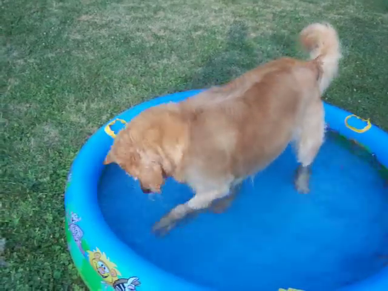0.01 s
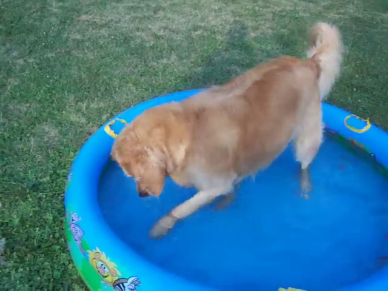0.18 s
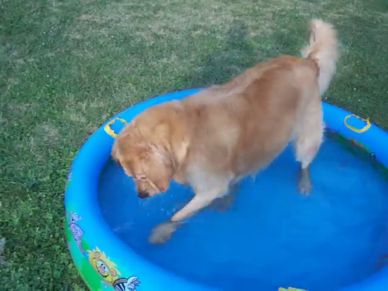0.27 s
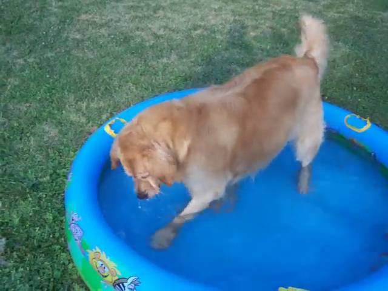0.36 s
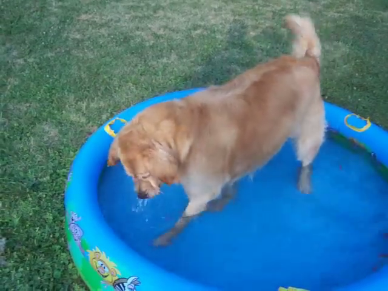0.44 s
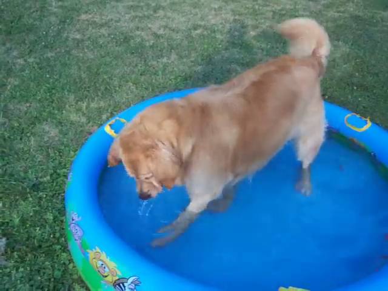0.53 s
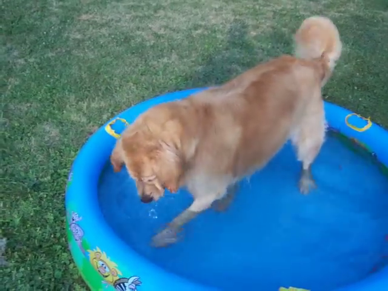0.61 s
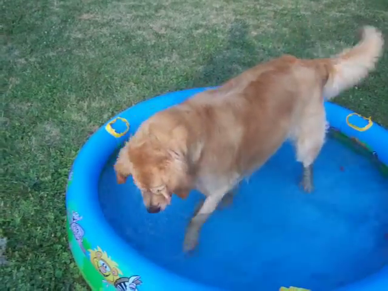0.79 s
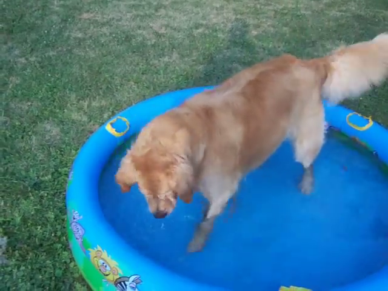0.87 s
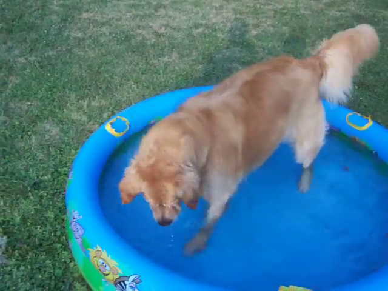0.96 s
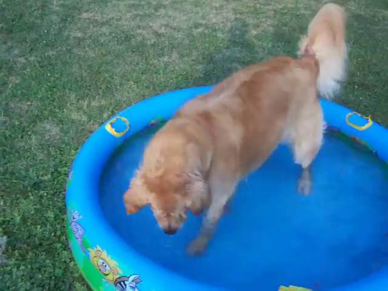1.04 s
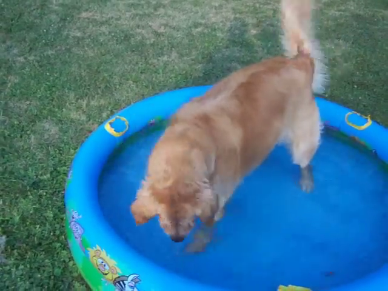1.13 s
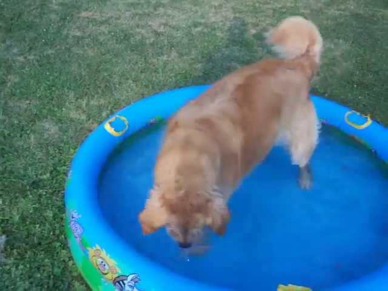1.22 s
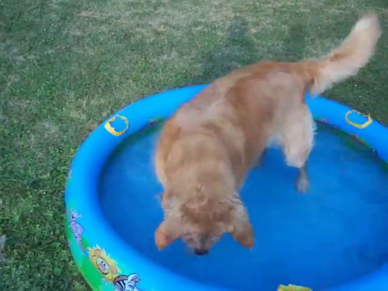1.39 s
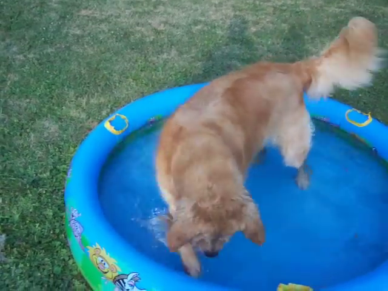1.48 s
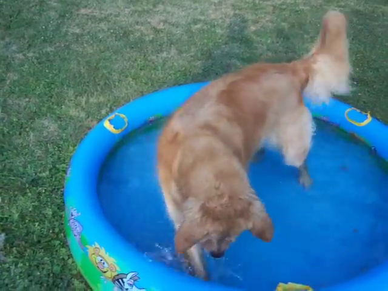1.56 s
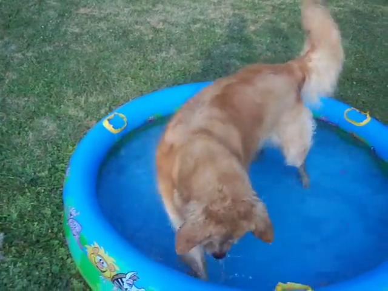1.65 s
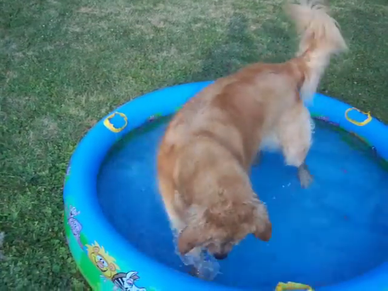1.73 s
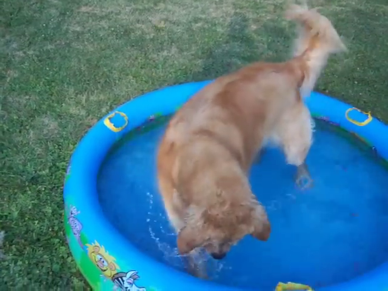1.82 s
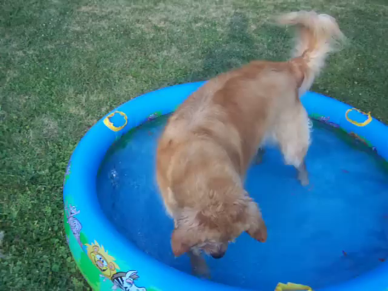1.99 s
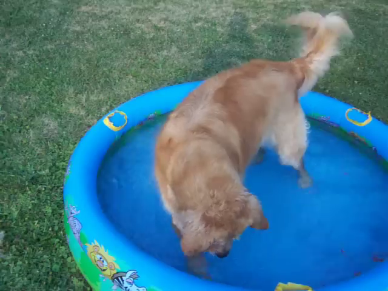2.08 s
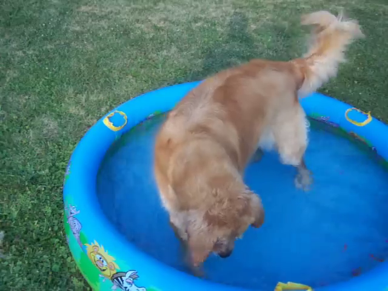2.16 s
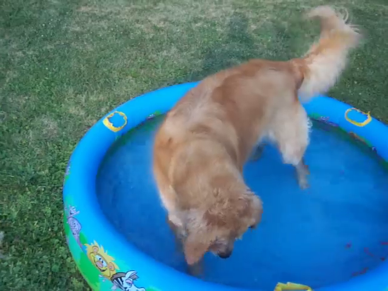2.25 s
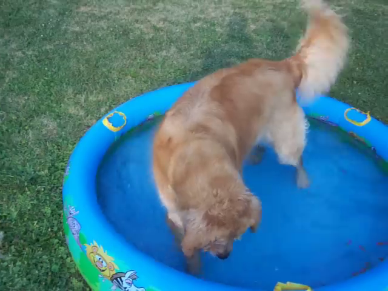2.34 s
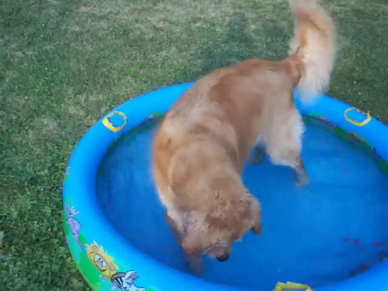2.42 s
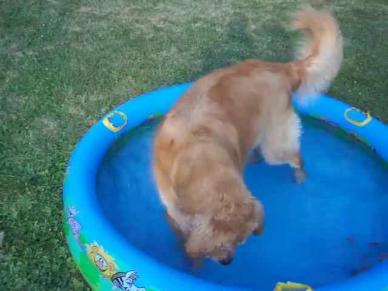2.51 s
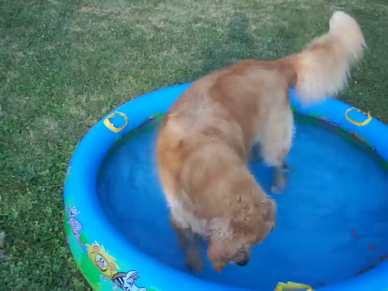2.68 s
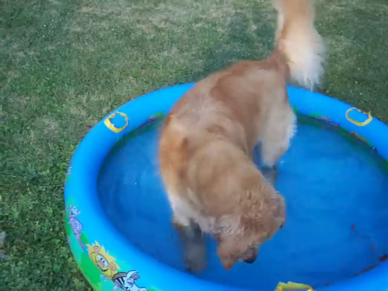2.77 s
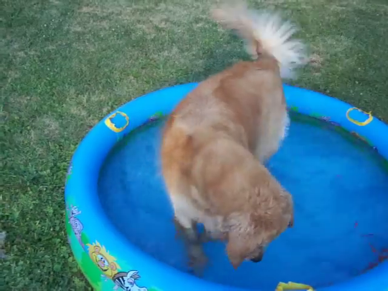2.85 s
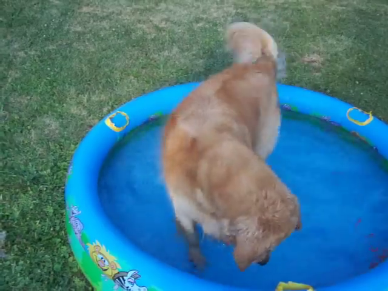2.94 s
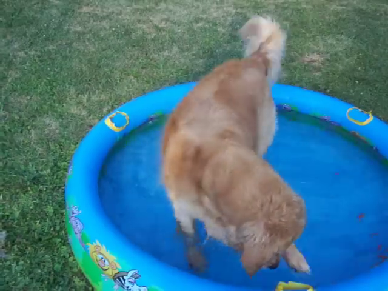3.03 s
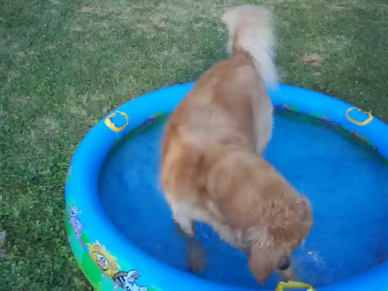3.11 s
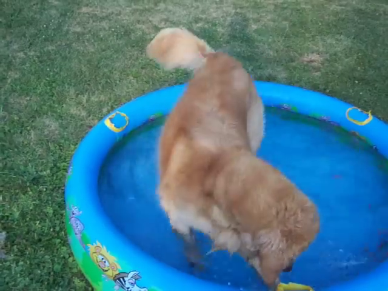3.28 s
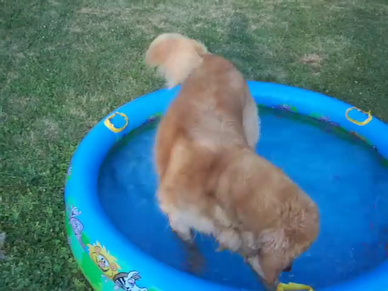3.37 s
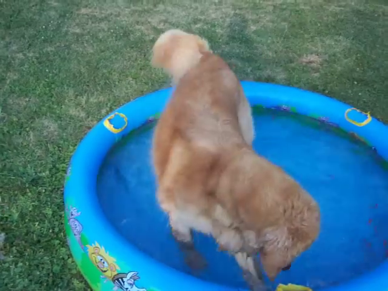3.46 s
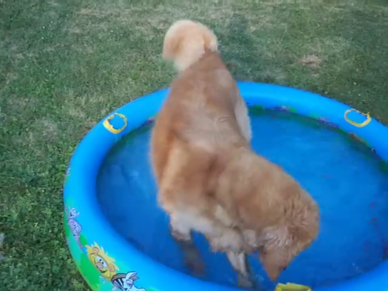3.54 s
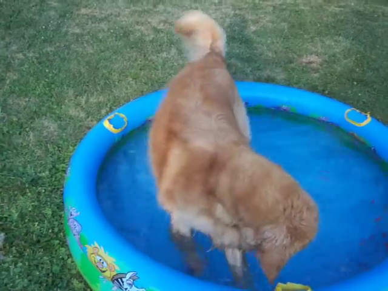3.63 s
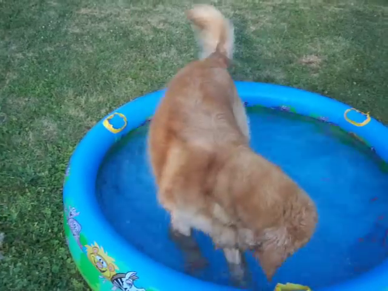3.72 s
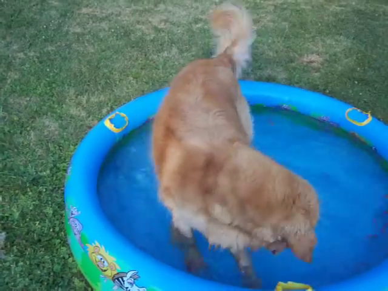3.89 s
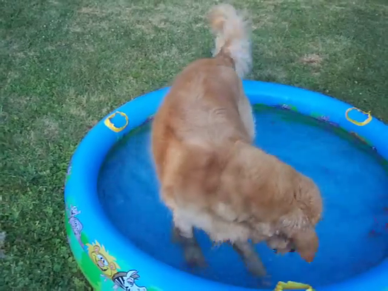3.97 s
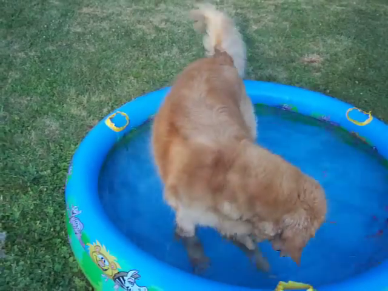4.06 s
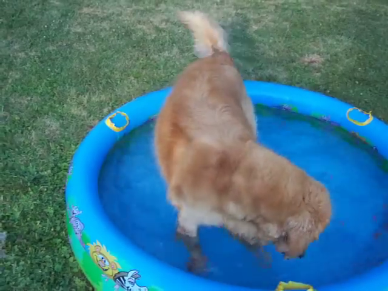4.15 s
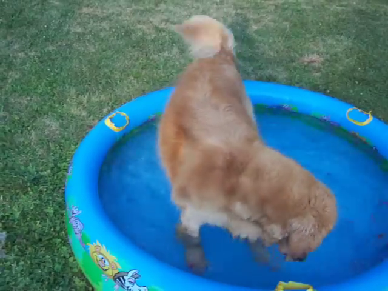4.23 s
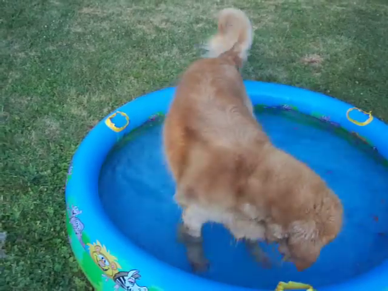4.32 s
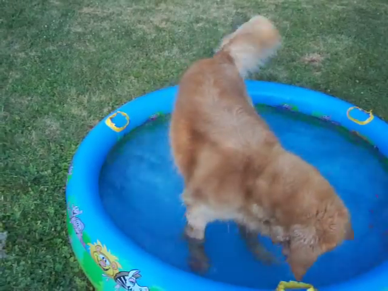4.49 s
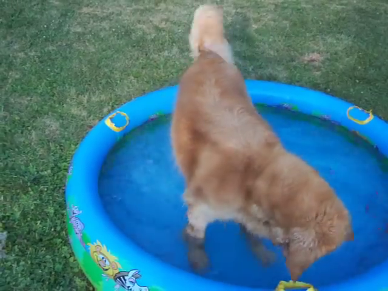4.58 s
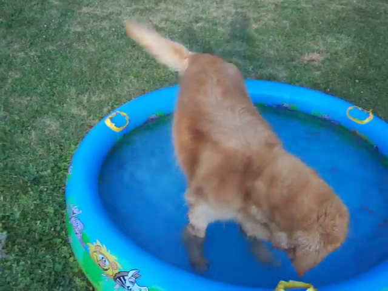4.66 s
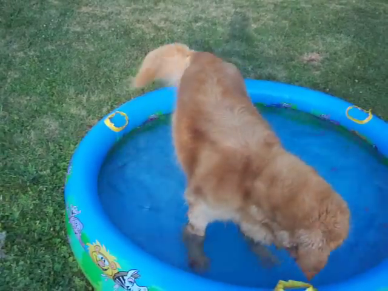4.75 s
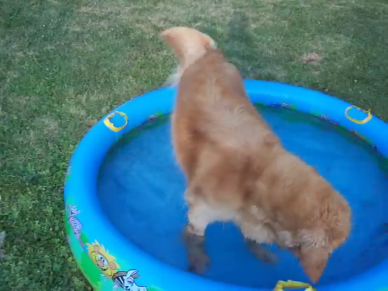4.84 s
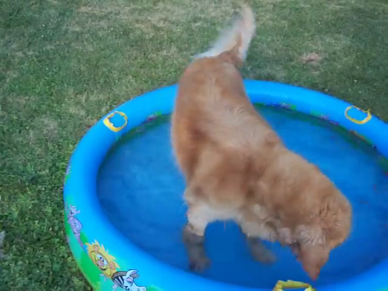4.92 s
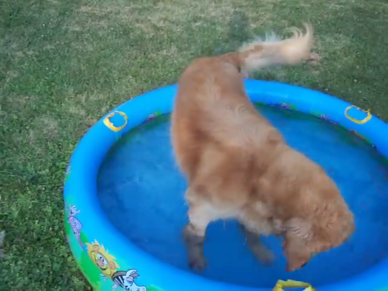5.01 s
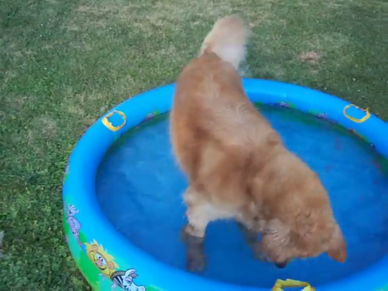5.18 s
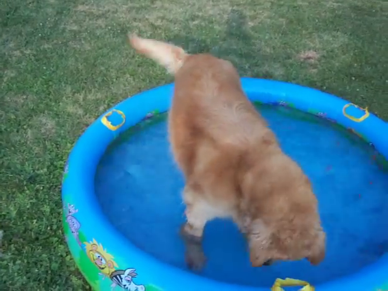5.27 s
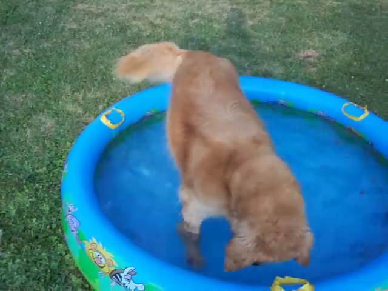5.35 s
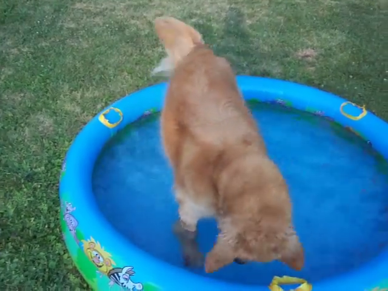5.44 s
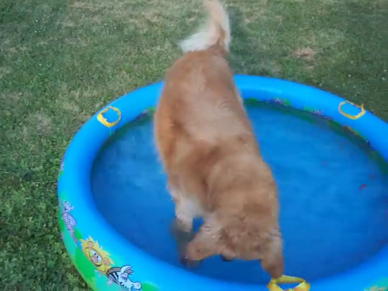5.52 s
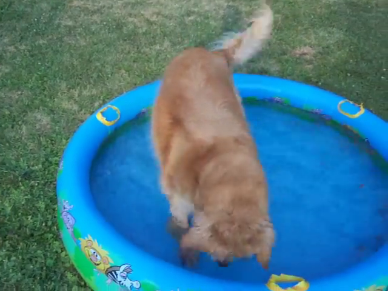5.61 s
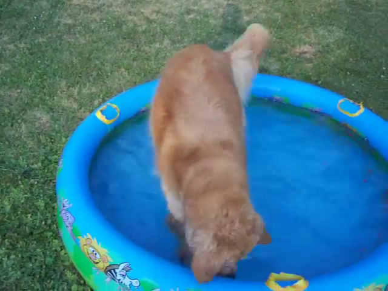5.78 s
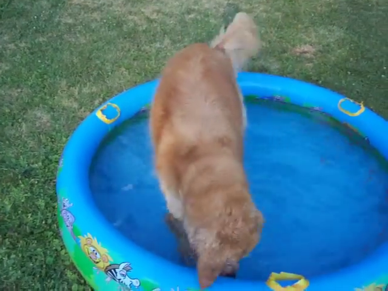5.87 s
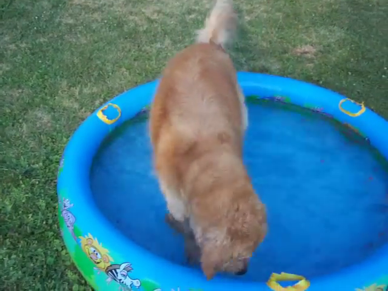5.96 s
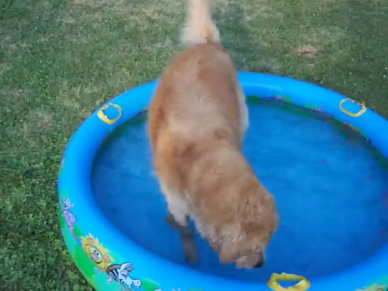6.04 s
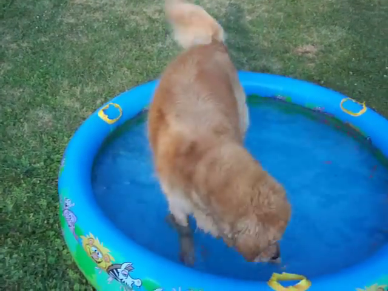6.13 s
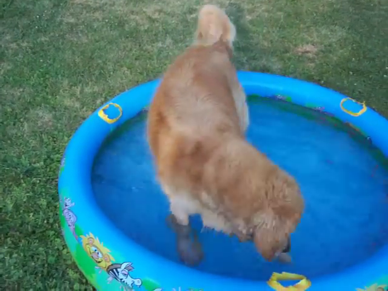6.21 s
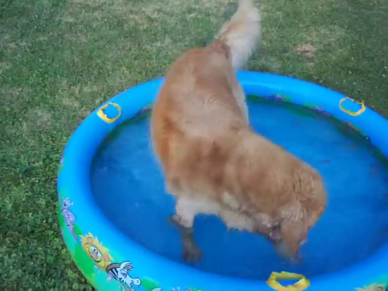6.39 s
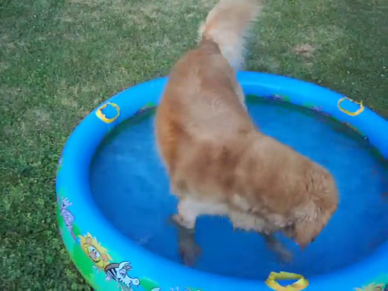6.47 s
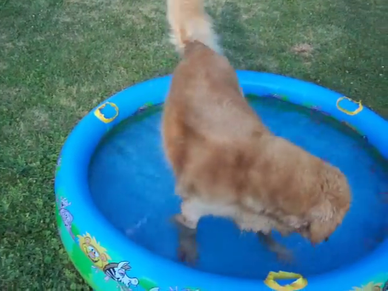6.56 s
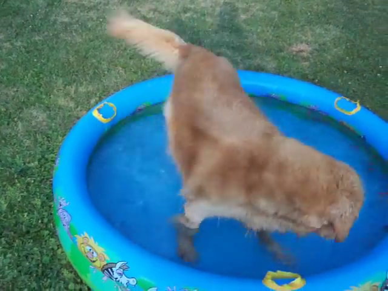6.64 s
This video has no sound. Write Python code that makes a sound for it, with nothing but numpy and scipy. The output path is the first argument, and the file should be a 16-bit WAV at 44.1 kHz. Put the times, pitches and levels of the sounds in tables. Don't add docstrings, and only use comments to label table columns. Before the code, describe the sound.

Outdoors on a lawn, a dog paws at shallow water in an inflatable pool. Sharp slaps and ringing droplets come in two main bouts, the second with deeper gulps. Between and after them a nearby songbird rattles off quick falling whistles. Insects buzz later, and a distant road grows slightly louder. The small camera microphone is dull on top, hissy, and overloads briefly on the hardest slaps.

```python
import sys
import numpy as np
from scipy import signal
from scipy.io import wavfile
from scipy.ndimage import uniform_filter1d

SR = 44100
rng = np.random.default_rng(int(sys.argv[2]) if len(sys.argv) > 2 else 0)


def transcribe(u):
    v = np.clip(np.atleast_2d(u).T, -1, 1)
    q = np.round(v * 32767).astype(np.int16)
    wavfile.write(sys.argv[1], SR, q)


def amplitude_ratio(level_db):
    exponent = np.asarray(level_db, float) / 20
    return 10 ** exponent


N = 295470

# (time [s], hold [s], spray level [dB],
# fizz level [dB])
STROKES = [(0.001, 0.01, -34.5, -62), (.452, 0.029, -22.5, -52.5), (1.01, 0.15, -34.5, -59),
           (1.475, 0.029, -34.5, -53), (1.532, 0.052, -23, -43.5), (1.625, 0.055, -22.5, -48.5),
           (1.71, 0.16, -35.5, -58), (1.845, 0.11, -28.5, -59), (2.94, 0.16, -29, -57),
           (3.135, 0.014, -19, -43), (3.19, 0.044, -26, -53), (3.25, 0.087, -24.5, -55),
           (3.42, 0.25, -32, -56.5), (1.33, 0.11, -36, -62), (.05, 1.6, -58, -67.5), (1.97, 1.7, -51, -64),
           (3.66, 0.6, -42, -63), (5.71, 0.03, -39, -66), (6.04, 0.019, -32.5, -59)]
STROKE_RISE_S, STROKE_FADE_DB_PER_S = 0.026, 401.5
DRIP_DB, DRIP_FIZZ_DB = -39, -71.5
SWELL = 0.09
# (time [s], hold [s], level [dB])
SLOSH = [
    (.44, 0.032, -38),
    (1.31, 0.15, -34.5),
    (1.65, 0.01, -36),
    (2.94, .025, -40),
    (3.12, 0.016, -40.5),
    (3.26, 0.035, -36),
    (3.48, 0.14, -33.5),
]
SLOSH_RISE_S, SLOSH_FADE_DB_PER_S, LAPPING_DB = 0.016, 255, -49.5

# (time [s], peak level [dB], bubble pitch [Hz])
SMACKS = [(.1016, -16, 5400), (.3792, -15, 3530), (.4478, -8, 3970), (.573, -20, 3600), (.6463, -18, 2210),
          (.7022, -7.5, 3020), (.7502, -20, 3350), (.7924, -24.5, 3700), (.9415, -15, 2360),
          (1.1212, -12.5, 3900), (1.1265, -18, 3560), (1.3543, -20, 2190), (1.487, -6, 2780),
          (1.5168, -4, 4900), (1.5494, -9, 4400), (1.5526, -14, 4400), (1.6765, -3, 4140),
          (1.699, -17, 3270), (1.7956, -21, 2460), (1.903, -11.5, 3260), (2.798, -16, 3770),
          (3.1201, -2, 2880), (5.7216, -17, 2920), (6.1382, -22, 4020)]
# (time [s], peak level [dB], bubble pitch [Hz])
PLINKS = [(.0813, -17, 4220), (.178, -25.5, 3320), (.4, -23.5, 2470), (.4064, -25, 3300),
          (.656, -19.5, 3380), (.6875, -12, 4280), (1.1403, -14.5, 3240), (1.5246, -20, 4460),
          (1.5753, -13, 3700), (1.6436, -9.5, 3500), (1.667, -7.5, 4340), (1.7197, -17.5, 2940),
          (1.8208, -16, 3500), (1.8538, -12.5, 2960), (2.005, -20, 3900), (2.0741, -19, 3420),
          (3.0986, -11.5, 4050), (3.1509, -7.5, 3350), (3.3945, -15.5, 2250), (6.346, -26, 3530)]
# (time [s], peak level [dB], bubble pitch [Hz])
BELLS = [(.4662, -17, 4930), (.9167, -23, 3520), (.972, -24, 3700), (1.1072, -25, 3400), (1.168, -28, 3800),
         (1.2243, -18, 3840), (1.467, -22, 3816), (1.602, -33, 3920), (1.74, -15, 4150),
         (1.9213, -15, 3840), (1.9225, -12, 3320), (3.0586, -12, 3700), (3.066, -12, 4000),
         (3.1522, -12, 3360), (3.2005, -11, 4160), (3.2545, -14.5, 4530), (3.2786, -16, 4010),
         (3.321, -12, 3130), (5.6606, -19.5, 4560), (5.9293, -18.5, 3550), (6.0202, -25.5, 4070)]
SMACK_RING_DB, PLINK_RING_DB, BELL_RING_DB = -3, 2.5, 4.5
# (time [s], peak level [dB], pitch [Hz])
SPECKS = [(0.3815, -15.5, 4450), (.107, -26, 6500), (.128, -31, 7000), (.193, -20, 7800),
          (.1985, -22, 4000), (.315, -27, 7600), (.322, -25, 3200), (.4349, -30, 5500), (.481, -13, 5000),
          (.4855, -16, 5300), (.512, -28, 5000), (.524, -31, 4970), (.7118, -29, 5500), (.7417, -18, 7150),
          (1.0101, -22, 6000), (1.494, -16, 6500), (1.5217, -9, 5250), (1.5262, -6, 4400),
          (3.201, -3, 4420), (3.279, -5, 4000), (1.535, -20, 7000), (1.5454, -18, 6800), (1.563, -24, 3500),
          (1.572, -9, 5700), (1.585, -18, 4000), (1.6045, -14, 5550), (1.6223, -18, 3700),
          (1.632, -20, 3800), (1.6828, -12, 4700), (1.7105, -20, 6500), (1.8237, -4.5, 7750),
          (1.9624, -17, 6750), (2.0168, -19, 6500), (.4575, -12, 5300), (2.286, -24, 6500),
          (2.7516, -17, 6900), (3.0619, -11, 6850), (3.087, -18, 5500), (3.1223, -3, 4650),
          (3.1365, -13, 3470), (3.142, -11, 4500), (3.156, -13, 4800), (3.183, -7, 6800), (3.209, -7, 4300),
          (3.215, -5, 4600), (3.258, -20, 3500), (3.2955, -12, 4000), (3.418, -13.5, 3740),
          (3.478, -18, 3000), (3.498, -14.5, 2300), (3.511, -20, 6500), (3.55, -17, 2800),
          (3.558, -17, 4460), (3.5678, -16, 7000), (3.595, -16, 2800), (3.97, -22, 2800),
          (4.073, -15.5, 2900), (4.13, -20, 7500), (.4445, -15, 4800)]
# (time [s], peak level [dB], pitch [Hz], ring T60 [s])
POPS = [(1.3, -22, 2000, 0.013), (1.9, -22.5, 1250, 0.023), (1.5, -14.5, 1370, 0.009),
        (1.6779, -6, 1620, 0.0055), (1.6, -19, 1610, 0.022), (2.9442, -19.5, 950, 0.042),
        (1.8, -24, 1100, 0.036), (3.1363, -18, 940, 0.015), (3.2, -21, 1090, 0.021),
        (3.526, -22, 900, 0.015), (2.95, -18.5, 2090, 0.03), (1.9, -9, 7570, 0.0081),
        (3.596, 2, 7700, 0.0068), (1.667, -16, 790, 0.02)]
# (time [s], peak level [dB], pitch [Hz], ring T60 [s])
GULPS = [(0.443, -25, 268, 0.034), (1.306, -24.5, 406, 0.066), (1.655, -15, 608, 0.026),
         (1.664, -14.5, 490, 0.02), (1.679, -30, 890, 0.021), (1.856, -25.5, 1020, 0.055),
         (2.943, -48, 950, 0.062), (3.132, -28, 750, 0.04), (3.289, -22, 680, 0.045),
         (3.297, -19, 480, 0.036), (3.337, -26, 565, 0.064), (3.307, -16.5, 398, 0.058),
         (3.341, -5.5, 534, 0.046), (3.553, -24, 434, 0.081), (3.594, -26, 490, 0.052),
         (3.4, -23, 382, 0.053), (3.477, -32, 655, 0.095), (3.539, -19.5, 363, 0.061),
         (3.931, -28, 562, 0.16), (4.026, -24.5, 458, 0.041), (5.76, -14.5, 746, 0.016)]
POOL_HZ = 285.6

# (time [s], length [s], start pitch [Hz], end pitch [Hz], level [dB])
BOW_NOTES = [(2.106, 0.01, 6870, 3860, -18), (2.229, 0.0079, 5850, 4480, -29),
             (2.306, 0.017, 6350, 3260, -25.5), (2.058, 0.0054, 5200, 4300, -25.5),
             (3.36, .008, 6600, 5800, -30), (2.769, 0.01, 7240, 4700, -16.5),
             (2.868, 0.018, 6240, 3770, -20.5), (2.903, 0.0065, 6800, 5020, -23),
             (3.185, 0.0075, 5980, 5450, -25), (3.231, 0.014, 7090, 4690, -19.5),
             (3.351, 0.025, 6260, 4570, -24), (3.533, 0.03, 4700, 3950, -29),
             (3.728, 0.013, 4560, 3460, -28), (4.117, 0.022, 6600, 3850, -21.5),
             (4.246, .012, 5500, 4200, -26), (4.253, 0.013, 6530, 5320, -23),
             (4.659, 0.013, 5500, 3800, -29), (4.941, 0.029, 5600, 4150, -34.5),
             (5.318, 0.01, 6440, 5400, -29)]
# (time [s], length [s], start pitch [Hz], end pitch [Hz], level [dB])
FLICK_NOTES = [(2.169, 0.015, 6500, 3700, -23.5), (2.237, 0.011, 5430, 3014, -29),
               (2.219, .006, 6300, 5700, -26), (2.448, 0.013, 5120, 3200, -33),
               (2.461, .007, 7400, 6500, -28), (2.204, .008, 2400, 4000, -32.5),
               (2.987, .006, 6030, 5400, -29), (3.195, .009, 6280, 5700, -26),
               (3.671, 0.0055, 6240, 5560, -26), (2.362, 0.0078, 5460, 6600, -27.5),
               (2.472, 0.008, 7030, 5000, -25.5), (2.552, 0.0056, 7340, 5240, -16.5),
               (2.668, 0.0044, 6700, 5000, -20), (2.739, 0.011, 5670, 5930, -22.5),
               (2.825, 0.0044, 7200, 4900, -17.5), (2.878, 0.016, 5910, 3800, -24.5),
               (3.015, 0.0062, 6060, 5350, -20.5), (3.047, 0.0056, 6200, 5150, -18),
               (3.456, 0.028, 4600, 4000, -28), (3.663, 0.006, 5900, 5040, -22),
               (3.768, 0.017, 6730, 3580, -26), (3.924, 0.011, 5670, 3980, -31),
               (3.95, 0.025, 6300, 3580, -28.5), (4.067, 0.01, 6520, 4200, -18.5),
               (4.114, .012, 5000, 3860, -28), (4.155, 0.0061, 7200, 5800, -21),
               (4.177, 0.019, 6580, 3750, -23.5), (4.345, 0.0087, 5800, 4560, -21.5),
               (4.414, 0.037, 5640, 3610, -29.5), (4.853, 0.01, 6070, 5230, -32)]
# (time [s], length [s], start pitch [Hz], end pitch [Hz], level [dB])
SCOOP_NOTES = [(2.213, 0.016, 5540, 3960, -31), (2.379, .031, 5850, 3560, -28.5),
               (2.388, 0.016, 6100, 4100, -31), (2.965, .017, 5040, 5700, -30),
               (3.007, 0.031, 6100, 4260, -22.5), (3.075, 0.026, 6460, 3840, -24.5),
               (3.245, 0.007, 6060, 5600, -22), (3.483, 0.024, 6500, 5070, -26.5),
               (4.075, 0.03, 4450, 3500, -33), (3.252, 0.022, 5280, 4470, -25),
               (4.738, .015, 6440, 5230, -34.5), (5.074, 0.02, 5200, 3860, -38)]
# (time [s], length [s], start pitch [Hz], end pitch [Hz], level [dB])
HOOK_NOTES = [
    (2.608, 0.014, 4950, 4900, -27.5),
    (2.65, 0.032, 6100, 3510, -26.5),
    (2.958, 0.019, 4620, 4380, -28),
    (3.431, 0.029, 6640, 5400, -21.5),
    (4.585, 0.0064, 5500, 5030, -25.5),
]
BOW_BEND, FLICK_BEND, SCOOP_BEND, HOOK_BEND = .3, .47, .63, .84
# (time [s], length [s], start pitch [Hz], shelf pitch [Hz], level [dB])
STEP_NOTES = [(2.888, .038, 5700, 4650, -24), (2.73, .042, 5500, 4350, -25.5), (2.5, .03, 5700, 3900, -29),
              (2.542, 0.04, 6600, 4840, -26.5), (3.433, 0.039, 5600, 4300, -27.5),
              (3.603, 0.049, 5900, 4500, -26), (3.903, 0.039, 5900, 4300, -27.5),
              (3.973, .034, 4900, 4300, -30.5), (4.136, 0.04, 6200, 4600, -29.5),
              (3.777, .043, 6500, 4970, -21.5)]
STEP_MARKS = (0, .38, .66, 1)
STEP_SAG = (.93, .74)
# (time [s], length [s], level [dB], knee pitch [Hz], lisp level [dB])
SLURS = [
    (3.62, 0.056, -18, 5900, -9),
    (3.813, 0.062, -20, 5800, -12),
    (4.007, 0.064, -22.5, 5560, -6.5),
    (4.205, 0.068, -22.5, 5720, -22),
    (4.409, .061, -28, 5700, -26),
    (4.618, 0.063, -37, 5700, -34),
]
SLUR_MARKS = (0, .17, .62, 1)
SLUR_TOP_HZ, SLUR_SHELF_HZ, SLUR_END_HZ = 7080, 6500, 3700
# (time [s], length [s], start pitch [Hz], level [dB])
SLIDES = [
    (4.308, .042, 5740, -33),
    (4.458, 0.06, 6800, -32.5),
]
SLIDE_FALL = (0.19, 0.89)

# (time [s], level [dB])
BUZZ = [
    (0, -86),
    (1.9, -69),
    (2.6, -46.5),
    (3.6, -94.5),
    (4.4, -40),
    (5.0, -38),
    (5.7, -39.5),
    (6.2, -44.5),
    (6.7, -52),
]
# (time [s], tyre roar level [dB], engine rumble level [dB])
ROAD = [
    (0.0, -36, -40.5),
    (4.96, -30.5, -36.5),
    (6.05, -29.5, -36.5),
    (6.7, -29.5, -37),
]
# (frequency [Hz], level [dB])
TYRE_SPECTRUM = [(200, -15), (350, -3), (650, 1), (950, -0.5), (1300, 0.5), (1900, -7), (3500, -16.5),
                 (7000, -25.5)]
# (frequency [Hz], level [dB])
ENGINE_SPECTRUM = [(15, -27), (27, -16.5), (55, 7.5), (100, 2), (170, -0.5), (260, -6), (500, -47),
                   (900, -57)]
# (frequency [Hz], level [dB])
HISS_SPECTRUM = [(100, -12), (1500, -4), (4000, 0), (9000, -6)]
HISS_DB = -41.5
# (frequency [Hz], gain [dB])
MIC_RESPONSE = [(20, -3), (5800, 1), (6500, -4.5), (7300, -13.5), (8000, -20), (8600, -31), (9100, -49),
                (9800, -77.5), (11000, -100)]


def evened(x):
    return x / np.sqrt(np.mean(x ** 2) + 1e-20)


def read(points, hz):
    f, value = np.transpose(points)
    return np.interp(np.log(hz + 1), np.log(f + 1), value)


def curve(rows, column):
    rows = np.array(rows)
    return np.interp(np.arange(N) / SR, rows[:, 0], rows[:, column])


def add(mix, s, sound):
    part = mix[round(s * SR):][:len(sound)]
    part += sound[:len(part)]


def surges(rows, column, rest_db, rise_s, fade_db_per_s):
    t = np.arange(N) / SR
    power = amplitude_ratio(rest_db) ** 2
    for row in rows:
        start, hold = row[:2]
        after = np.maximum(t - start - hold, 0)
        rise = np.clip((t - start + rise_s) / (rise_s + SWELL * min(hold, .2)), 0, 1)
        power = power + (rise * amplitude_ratio(row[column] - fade_db_per_s * after)) ** 2
    return np.sqrt(power)


def bubble(hz, t60, glide, rise_s):
    t = np.arange(0, t60, 1 / SR)
    turns = hz * (t + (glide - 1) * t ** 2 / (2 * t60))
    return (1 - np.exp(-t / rise_s)) * amplitude_ratio(-60 * t / t60) * np.sin(2 * np.pi * turns)


def grains(lo_hz, hi_hz, cycles, per_s, spread_db, clump_db, tilt_db=0):
    clumps = amplitude_ratio(clump_db * evened(uniform_filter1d(rng.standard_normal(N), size=400)))
    out = np.zeros(N)
    for hz in np.geomspace(lo_hz, hi_hz, 24):
        size_db = tilt_db * np.log2(hz / lo_hz) + spread_db * np.minimum(rng.exponential(1, N), 4)
        arrives = rng.random(N) < per_s / 24 / SR
        hits = amplitude_ratio(size_db) * arrives * clumps
        out += signal.oaconvolve(hits, bubble(hz, cycles / hz, 1.19, .00008))[:N]
    return evened(out)


def stirred_water():
    spray = grains(2200, 6000, cycles=20, per_s=4000, spread_db=3.4, clump_db=3.5, tilt_db=3)
    slosh = grains(500, 3000, cycles=16, per_s=2200, spread_db=3.5, clump_db=3)
    fizz = amplitude_ratio(22.5) * grains(7040, 9500, cycles=24, per_s=1200, spread_db=2.5, clump_db=3)
    sheet = grains(3200, 5400, cycles=30, per_s=12000, spread_db=3, clump_db=4)
    stroke = STROKE_RISE_S, STROKE_FADE_DB_PER_S
    water = amplitude_ratio(-3) * spray * surges(STROKES, 2, DRIP_DB, *stroke)
    water += amplitude_ratio(-4) * sheet * surges(STROKES, 2, -80, *stroke)
    water += fizz * surges(STROKES, 3, DRIP_FIZZ_DB, *stroke)
    return water + slosh * surges(SLOSH, 2, LAPPING_DB, SLOSH_RISE_S, SLOSH_FADE_DB_PER_S)


def drops():
    out = np.zeros(N)
    t = np.arange(400) / SR
    kinds = (SMACKS, SMACK_RING_DB), (PLINKS, PLINK_RING_DB), (BELLS, BELL_RING_DB)
    for table, ring_db in kinds:
        for s, db, hz in table:
            smack = bubble(1.4 * hz, .005, .6, .00015)
            ring = bubble(hz, 48 / hz, 1.15, 0.00044)
            click = bubble(1.2 * hz, .0012, 1.0, .00003)
            band = signal.butter(2, [.75 * hz, 1.5 * hz], "band", fs=SR)
            spatter = signal.lfilter(*band, rng.standard_normal(400))
            add(out, s + .0013, amplitude_ratio(db - 1.5 - ring_db / 2) * smack)
            add(out, s + 0.001318, amplitude_ratio(db + ring_db) * ring)
            add(out, s + .0011, amplitude_ratio(db - ring_db - 7) * click)
            add(out, s + 0.000982, amplitude_ratio(db + ring_db - 4 - 60 * t / .022) * spatter)
    for s, db, hz in SPECKS:
        add(out, s, amplitude_ratio(db + 2.5) * bubble(hz, .006, 0.97, 0.00032))
    for s, db, hz, t60 in POPS:
        add(out, s, amplitude_ratio(db + 2.5) * bubble(hz, t60, 1.22, 0.00026))
    return out


def gulps():
    out = np.zeros(N)
    for s, db, hz, t60 in GULPS:
        add(out, s, amplitude_ratio(db + 4.5) * bubble(hz, t60, 0.89, 0.001))
        add(out, s, amplitude_ratio(db - 4.5) * bubble(POOL_HZ, 2.3 * t60, 1.7, 0.006))
    return out


def whistle(length, marks, pitch_hz, db, hold):
    t = np.arange(0, length, 1 / SR)
    u = t / length
    glide_hz = np.interp(u, marks, pitch_hz)
    hz = uniform_filter1d(glide_hz, size=len(t) // 8 + 1, mode="nearest")
    hz += 500 * np.exp(-t / .003)
    edges = np.minimum(1, t / 0.0022) * np.minimum(1, (length - t) / 0.00063)
    waver_db = 2.6 * np.sin(2 * np.pi * (rng.uniform(45, 120) * t + rng.random()))
    fade_db = 19 * u ** hold
    return amplitude_ratio(db + 5 - fade_db + waver_db) * edges * np.sin(2 * np.pi * np.cumsum(hz) / SR)


def echoed(song):
    t = np.arange(SR // 2) / SR
    signs = rng.choice([-1., 1.], len(t))
    sparse = rng.random(len(t)) < .04
    echoes = signs * sparse * amplitude_ratio(-60 * t / 0.59) * (t > .006)
    return song + amplitude_ratio(-14) * signal.oaconvolve(song, echoes / np.linalg.norm(echoes))[:N]


def bird():
    out = np.zeros(N)
    kinds = (BOW_NOTES, BOW_BEND), (FLICK_NOTES, FLICK_BEND), (SCOOP_NOTES, SCOOP_BEND), (HOOK_NOTES, HOOK_BEND)
    for notes, bend in kinds:
        for s, length, start_hz, end_hz, db in notes:
            pitch_hz = start_hz + (end_hz - start_hz) * np.array([0, bend, 1])
            add(out, s, whistle(length, [0, .44, 1], pitch_hz, db, hold=1.5))
    for s, length, start_hz, shelf_hz, db in STEP_NOTES:
        pitch_hz = [start_hz, *shelf_hz * np.array([1, *STEP_SAG])]
        add(out, s, whistle(length, STEP_MARKS, pitch_hz, db, hold=1.6))
    for s, length, start_hz, db in SLIDES:
        pitch_hz = start_hz + (SLUR_END_HZ - start_hz) * np.array([0, *SLIDE_FALL, 1])
        add(out, s, whistle(length, np.arange(4) / 3, pitch_hz, db, hold=2.6))
    for s, length, db, knee_hz, lisp_db in SLURS:
        pitch_hz = [SLUR_TOP_HZ, SLUR_SHELF_HZ, knee_hz, SLUR_END_HZ]
        add(out, s, whistle(length, SLUR_MARKS, pitch_hz, db, hold=2.1))
        add(out, s, whistle(0.0039, [0, 1], [8800, 7900], lisp_db, hold=1.6))
    return echoed(out)


def noise(spectrum, patchy_db):
    frames, hz = N // 256 + 5, np.fft.rfftfreq(1024, 1 / SR)
    real, imaginary, patches = rng.standard_normal((frames, 513, 3)).T
    patches = uniform_filter1d(patches, size=10, axis=0)
    patches = evened(uniform_filter1d(patches, size=14, axis=1))
    level_db = read(spectrum, hz)[:, None] + patchy_db * patches
    z = (real + 1j * imaginary) * amplitude_ratio(level_db)
    return evened(signal.istft(z, nperseg=1024, noverlap=768)[1][:N])


def insects():
    spectrum = [(4500, -30), (5300, -7), (5900, 0), (6700, 3), (7200, -3), (8000, -30)]  # (Hz, dB)
    throb = 1 + 0.29 * np.sin(2 * np.pi * 4.6 * np.arange(N) / SR)
    return amplitude_ratio(curve(BUZZ, 1)) * throb * noise(spectrum, patchy_db=.8)


def road():
    tyres = amplitude_ratio(curve(ROAD, 1) - 0.7) * noise(TYRE_SPECTRUM, patchy_db=0.56)
    engines = amplitude_ratio(curve(ROAD, 2)) * noise(ENGINE_SPECTRUM, patchy_db=1.1)
    return tyres + engines


def microphone_hiss():
    return amplitude_ratio(HISS_DB) * noise(HISS_SPECTRUM, patchy_db=.6)


def scene():
    water = stirred_water() + drops() + gulps()
    mix = water + bird() + insects() + road() + microphone_hiss()
    return mix[None]


def low_pass(x):
    return signal.sosfilt(signal.butter(12, 16200, fs=SR, output="sos"), x)


def record(dry):
    hz = np.linspace(0, SR / 2, 257)
    gain = amplitude_ratio(read(MIC_RESPONSE, hz)) * (hz < SR / 2)
    taps = signal.firwin2(601, hz, gain, fs=SR, window=("kaiser", 9))
    dull = signal.oaconvolve(dry, taps[None], "same")
    clipped = np.clip(dull, -.69, .69)
    return low_pass(clipped)


dry = scene()
out = record(dry)
transcribe(out)
```